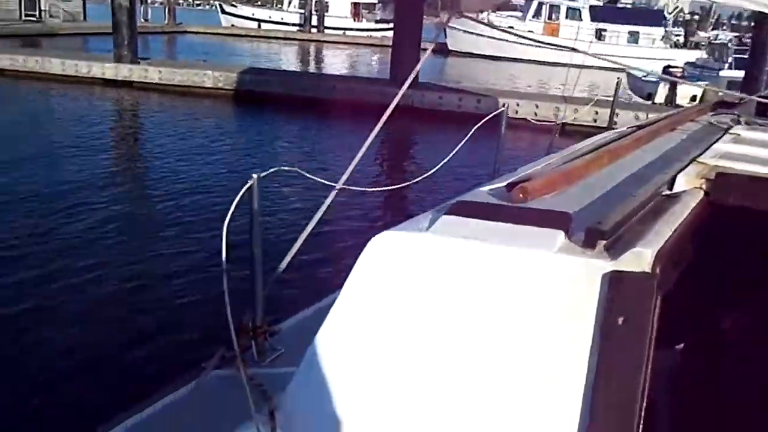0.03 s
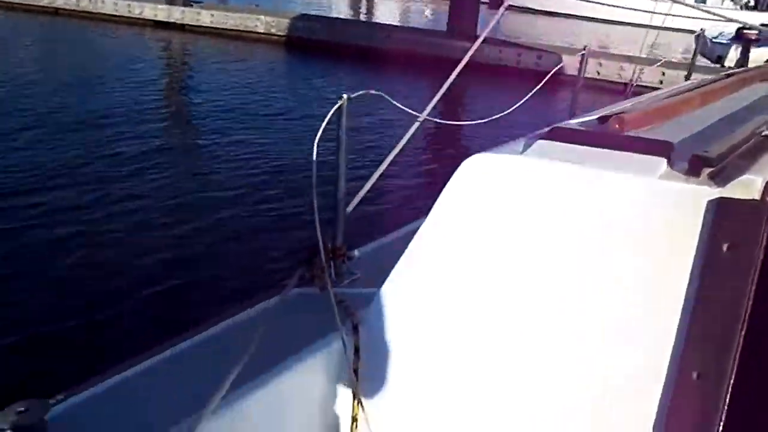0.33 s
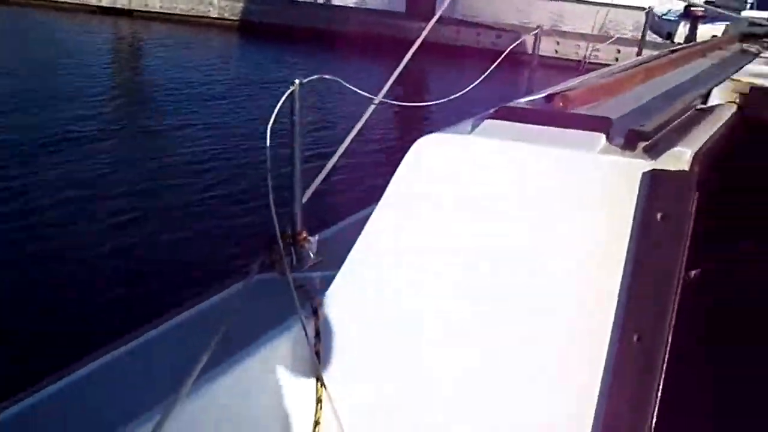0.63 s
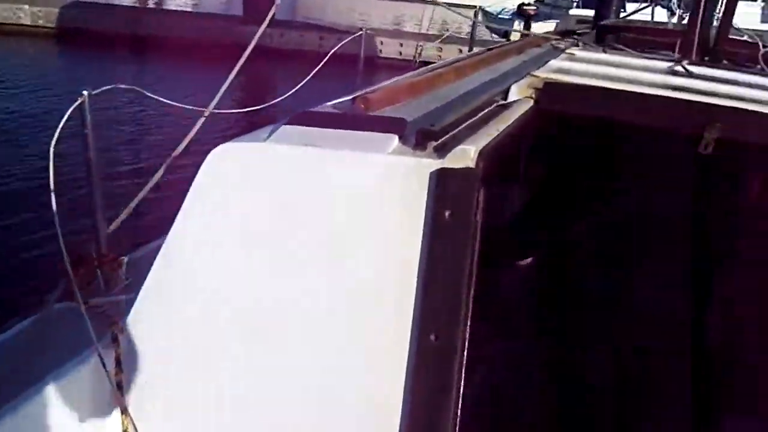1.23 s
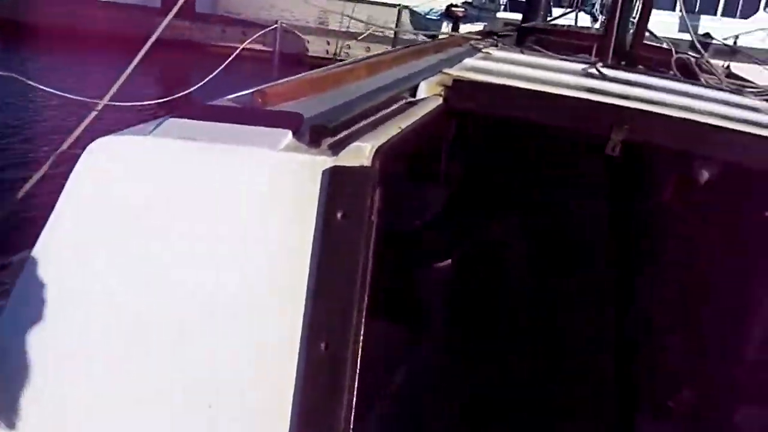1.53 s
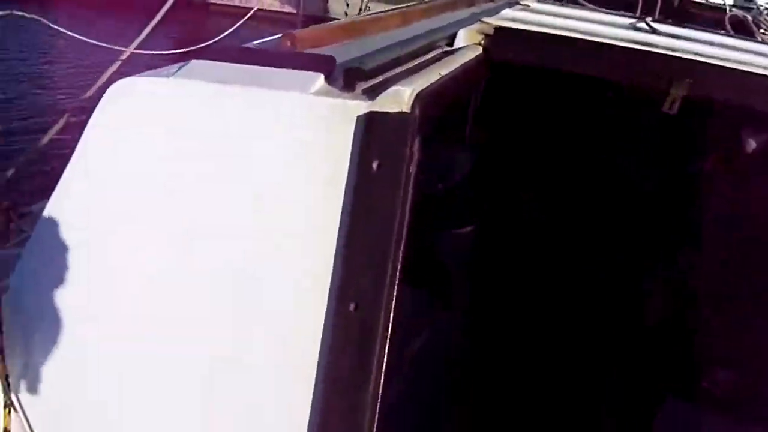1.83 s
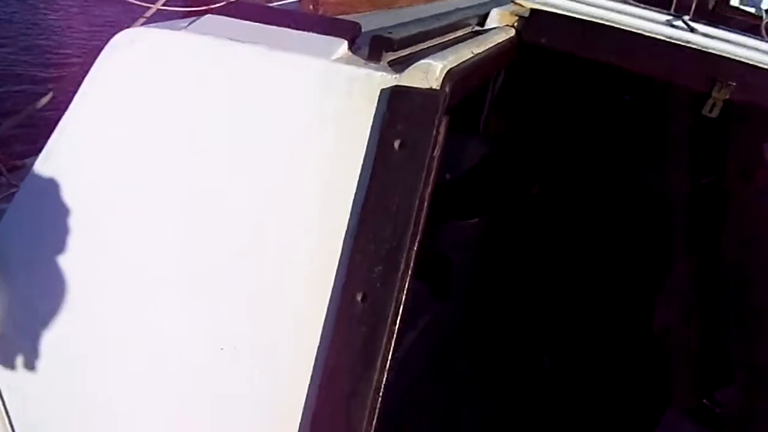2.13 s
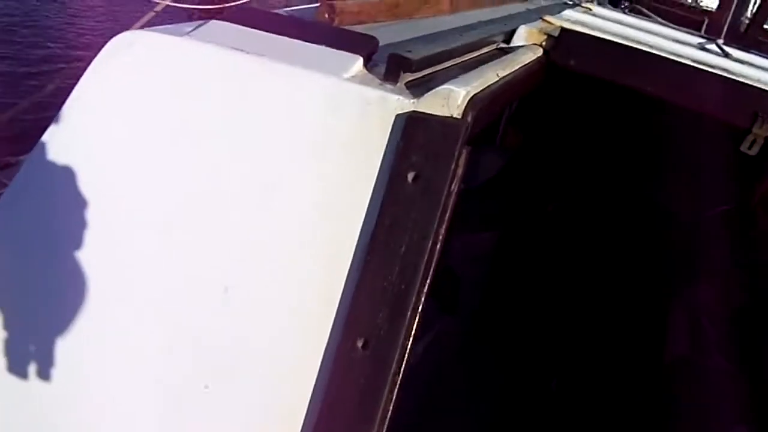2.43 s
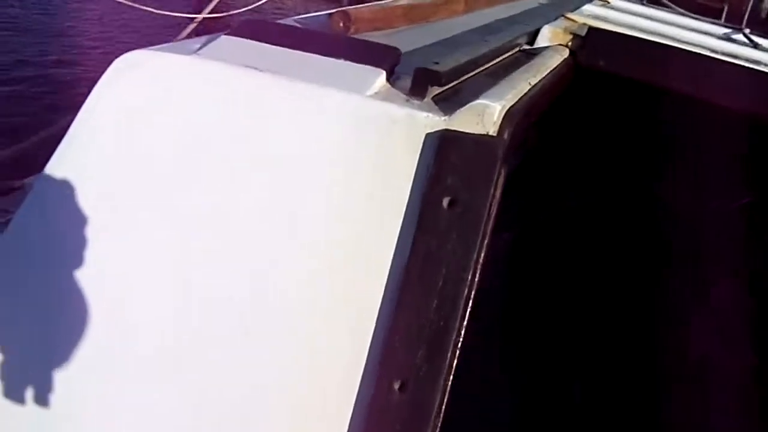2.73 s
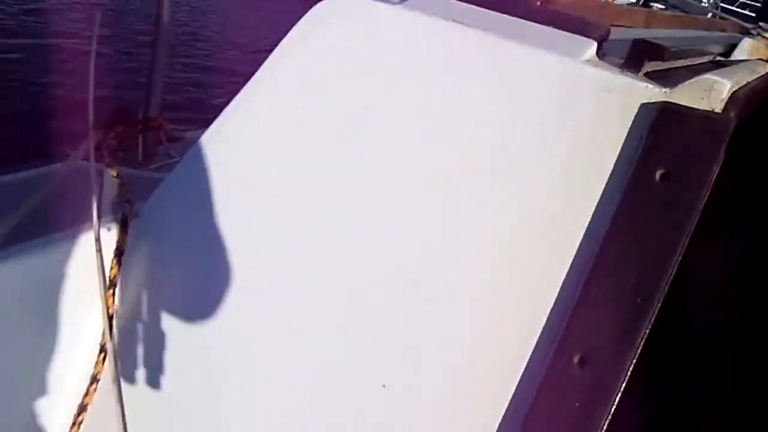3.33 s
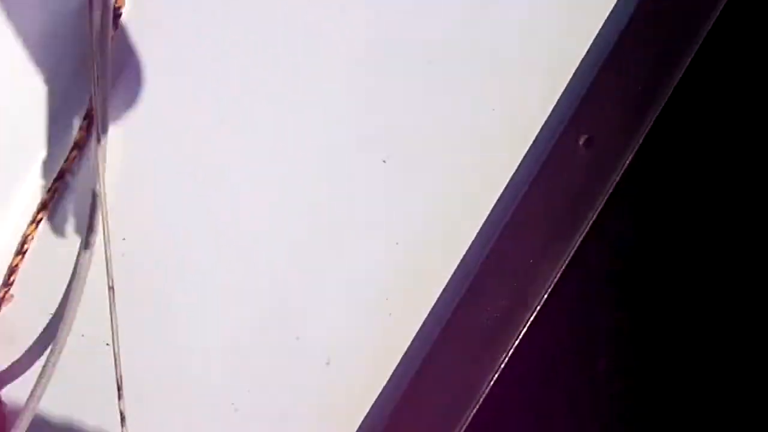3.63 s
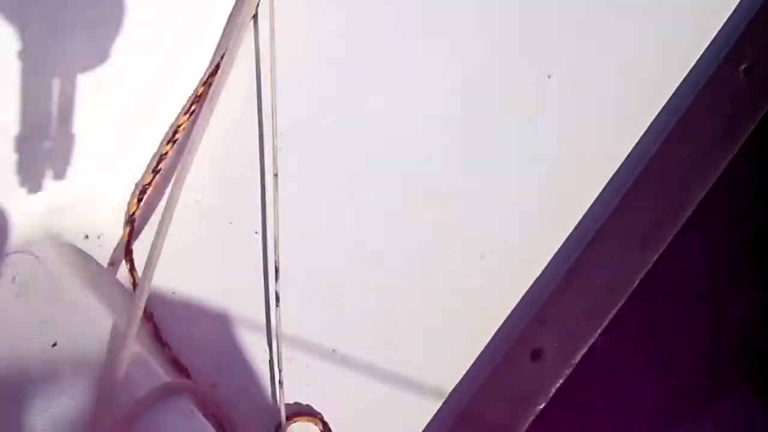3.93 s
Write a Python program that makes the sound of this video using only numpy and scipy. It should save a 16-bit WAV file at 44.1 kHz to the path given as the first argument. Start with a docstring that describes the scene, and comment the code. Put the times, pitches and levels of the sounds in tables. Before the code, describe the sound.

Wind buffets the microphone on a sailboat deck, with handling clicks and a hollow knock.

```python
"""On the deck of a moored sailboat. Gusts buffet the microphone over the wash of harbour water, the hum
of a distant machine and faint far-off squeals. A sleeve brushes past, the hand-held camera clicks and
rubs, a small metal ring taps, and deck and hull take soft bumps. Something knocks on the hollow cabin;
then a hard fitting scrapes, clacks and squeaks as it starts to slide. Struck parts ring in damped modes;
wind, water and rubbing are shaped noise."""
import sys
import numpy as np
from scipy.fft import rfft, irfft, next_fast_len
from scipy.io import wavfile
from scipy.ndimage import map_coordinates

SR = 44100
rng = np.random.default_rng(int(sys.argv[2]) if len(sys.argv) > 2 else 0)


def int16_out(signal):
    """Quantize to a 16-bit WAV file."""
    q = np.round(np.clip(np.atleast_2d(signal).T, -1, 1) * 32767)
    wavfile.write(sys.argv[1], SR, q.astype(np.int16))


N = 176400
TIME_S = np.arange(N) / SR

# Wind spectra. Each row: frequency in Hz, level in dB.
RUMBLE_SPECTRUM = [(15, -4), (30, -7.5), (60, -3), (90, 0.5), (125, -2.5), (160, -6.5), (220, -9.5),
                   (350, -21), (700, -44), (2000, -84)]
DEEP_SPECTRUM = [(15, -3.5), (32, -3), (60, 0.5), (90, -7), (160, -17), (400, -57)]
FLOOR_SPECTRUM = [(50, -49), (120, -4), (200, -2), (330, -2), (500, -9.5), (900, -25), (2500, -42)]
# Gust rumble and its deepest layer. Each row: time in seconds, level in dB.
RUMBLE_DB = [(0, -49), (.3, -43.5), (.42, -30), (.52, -38), (.62, -43.5), (.69, -28), (.92, -28.5),
             (1.13, -29.5), (1.17, -40), (1.62, -46), (1.67, -34), (1.81, -45.5), (1.86, -33.5),
             (1.91, -28.5), (1.98, -42.5), (2.36, -50), (2.5, -39), (2.76, -44.5), (2.96, -35.5),
             (3.04, -39), (3.12, -26.5), (3.19, -50), (3.38, -44.5), (3.47, -38), (4, -46)]
DEEP_DB = [(0, -42), (1.4, -63.5), (1.65, -32.5), (1.76, -43.5), (1.88, -24), (2.0, -46.5), (2.14, -39.5),
           (2.27, -35), (2.36, -43), (2.44, -27), (2.52, -42), (2.8, -42), (2.94, -30), (3.05, -45),
           (4, -69)]
# Single eddies. Each row: centre in seconds, level in dB, half width in seconds.
EDDIES = [(0.363, -10.5, 0.0014), (0.4631, -16, 0.0019), (.475, -25.5, 0.0011), (0.686, -20.5, 0.0013),
          (0.706, -21.5, 0.0019), (0.862, -19, 0.0012), (.948, -22.5, 0.00093), (1.0421, -24, 0.001),
          (1.11, -25.5, 0.005), (1.832, -20.5, 0.0021), (1.889, -19.5, 0.0035)]
# Machine's main and high tones. Each row: time in seconds, level in dB.
HUM_MAIN_DB = [(0, -37.5), (.7, -40.5), (1.2, -38.5), (1.55, -35), (1.85, -36), (2.1, -38.5), (2.5, -35.5),
               (2.65, -38.5), (3, -34), (3.2, -39.5), (3.5, -41), (4, -47.5)]
HUM_HIGH_DB = [(0, -50), (1.5, -50.5), (1.9, -47), (2.6, -48), (2.95, -39), (3.3, -46), (3.65, -44.5),
               (4, -58)]
# Water wash, hiss and sleeve swish. Each row: frequency in Hz, level in dB.
WASH_SPECTRUM = [(100, 1.5), (200, 5), (350, -1), (550, -5), (800, -8), (1200, -14.5), (2000, -23.5),
                 (4000, -36.5), (14000, -40)]
HISS_SPECTRUM = [(500, 4), (1500, -3), (3000, -0.5), (4800, -0.5), (7000, -2.5), (10000, -4), (14000, -4.5)]
SWISH_SPECTRUM = [(2500, -20), (4700, 2.5), (6000, -15), (8000, 3), (9400, -8), (10500, 3), (11600, -13)]
# Hiss and swish envelopes. Each row: time in seconds, level in dB.
HISS_DB = [(0, -60.5), (.65, -64.5), (.95, -56), (1.15, -60.5), (1.42, -56), (1.7, -60.5), (1.88, -58),
           (2.28, -52), (2.45, -55), (2.8, -56), (3.1, -51.5), (3.38, -52.5), (3.52, -58.5), (3.72, -59.5),
           (3.95, -57), (4, -44)]
SWISH_DB = [(.65, -93), (.8, -61), (1.05, -63.5), (1.15, -69.5), (1.42, -60), (1.6, -62), (1.7, -85),
            (2.2, -85)]
# Camera clicks. Each row: start in seconds, four band levels in dB ahead of the casing, t60 in seconds.
CAMERA_CLICKS = [(0.9206, -63, -46, -36, -42, 0.026), (0.949, -66.5, -56, -41.5, -43, 0.054),
                 (2.433, -50, -35, -61, -60, 0.02), (2.4373, -29, -26, -29, -35, 0.034),
                 (2.747, -73, -54, -44.5, -58, 0.021), (2.9626, -48, -42, -56, -62, 0.014),
                 (2.9732, -46, -62, -34.5, -39, 0.017), (3.017, -46, -49, -46, -51, 0.068),
                 (3.0871, -21, -26, -51, -33.5, 0.052), (3.1371, -40.5, -19, -19, -17.5, 0.0214),
                 (3.1391, -23, -23, -32, -26.5, 0.0328), (3.1499, -30, -37, -36, -28, 0.012),
                 (3.161, -31.5, -49, -55, -34.5, 0.026), (3.179, -36, -30, -37, -36, 0.035),
                 (3.6467, -69.5, -72, -44.5, -47, 0.031), (3.710, -53, -53, -51, -45, 0.051),
                 (3.8997, -36.5, -34, -33.5, -40, 0.073), (3.949, -46, -49.5, -38, -43, 0.042)]
# Edges of those four bands in Hz, low to high.
CLICK_BANDS_HZ = [300, 1000, 3000, 6000, 14500]
# Casing response. Each row: frequency in Hz, gain in dB.
CASING_RESPONSE = [(700, -1), (1400, 1), (1900, 1), (2550, 3.5), (3050, -5.5), (4100, 2.5), (4650, -1),
                   (5200, 3), (6200, -4.5), (8000, -3.5), (13000, -5)]
# Deck bumps. Each row: start in seconds, body level in dB, rasp level in dB, body t60 in seconds.
DECK_BUMPS = [(1.176, -41.5, -46.5, 0.24), (1.803, -44, -45, 0.1), (2.089, -41.5, -46.5, 0.094),
              (2.45, -29, -43, 0.085), (2.926, -47.5, -49, 0.88), (3.068, -28, -35.5, 0.061),
              (3.1, -26.5, -34, 0.27), (3.222, -59, -37, 0.048), (3.369, -33.5, -45.5, 0.097),
              (3.419, -32, -38.5, 0.11), (3.665, -36, -43, 0.11), (3.745, -50.5, -42.5, 0.078),
              (3.774, -37.5, -41, 0.26)]
# Bump spectra. Each row: frequency in Hz, level in dB.
BODY_SPECTRUM = [(120, -14), (250, -2.5), (355, 4.5), (430, -8), (520, 0), (750, -7.5), (1100, -26),
                 (3000, -39)]
RASP_SPECTRUM = [(400, -13), (800, -2.5), (1400, -1.5), (2500, -8), (4000, -12.5), (7000, -19),
                 (14000, -24)]
# Modes of the struck parts. Each row: frequency in Hz, level in dB, t60 in seconds.
SHACKLE_MODES = [(2090, -13.5, 0.059), (2430, -5.5, 0.032), (2670, -2, 0.016), (3800, -6.5, 0.016),
                 (4600, 1.5, 0.016), (5100, 0, 0.0074), (5360, -5, 0.035), (7740, -10, 0.018)]
HULL_MODES = [(350.5, -10.5, 0.16), (379.5, 2, 0.0604), (480, -5, 0.04), (596, -12, 0.047),
              (840, -13, 0.038)]
CABIN_MODES = [(194, -9, 0.063), (357, -18, 0.06), (505, -11, 0.086), (615, -6, 0.026), (725, -9.5, 0.031),
               (937, -3, 0.026), (1058, 0, 0.022), (1147, 1.5, 0.024)]
FITTING_MODES = [(1044, -12.5, 0.12), (1504, -4.5, 0.031), (2210, -10, 0.024), (3868, 3, 0.024),
                 (4020, 3, 0.02), (5265, -1.5, 0.025), (6340, -10.5, 0.022), (7500, -14.5, 0.028),
                 (11100, -22, 0.016)]
# Strikes on those parts. Each row: start in seconds, level in dB.
SHACKLE_HITS = [(.9217, -33), (.9502, -40.5), (.9592, -36.5)]
HULL_HITS = [(1.178, -25), (2.4495, -27), (3.425, -34)]
CABIN_HITS = [(3.0882, -8), (3.0911, -11)]
FITTING_HITS = [(3.901, -18.5), (3.9045, -26.5)]
# Gliding tones. Each row: start and length in seconds, start and end pitch in Hz, level in dB.
FAR_SQUEALS = [(1.381, 0.078, 1070, 1090, -53.5), (1.45, 0.0495, 2110, 2173, -59),
               (1.522, 0.14, 1390, 1290, -60.5)]
FRICTION_SQUEAKS = [(2.934, 0.016, 2400, 2560, -47), (3.014, 0.014, 3300, 3380, -48),
                    (3.067, 0.0071, 2200, 2350, -38), (3.845, 0.07, 1010, 1030, -46.5),
                    (3.935, 0.085, 1090, 1160, -41.5), (3.945, 0.065, 2860, 2780, -47),
                    (3.97, 0.045, 2600, 2530, -46), (3.963, 0.05, 4740, 4580, -47)]
# First contact of hard clicks. Each row: centre in seconds, level in dB, half width in seconds.
CONTACT_SNAPS = [(2.4389, -19, 0.00012), (2.9738, -27.5, 0.000045), (3.1379, -6.5, 0.000026)]
# Scrape envelope. Each row: time in seconds, level in dB.
SCRAPE_DB = [(3.72, -70), (3.8, -53), (3.88, -44.5), (3.93, -40), (4, -36.5)]
# Scrape resonances. Each row: frequency in Hz, bandwidth in Hz, relative level in dB.
SCRAPE_RESONANCES = [(345, 85, 3.5), (450, 81, 0), (716, 72, -3.5), (1077, 110, -5), (1240, 92, -1.5),
                     (1400, 170, -7.5), (2470, 173, -7), (2890, 160, -13), (3723, 380, -8), (4810, 360, -9),
                     (6850, 2400, -21)]


def amp(db):
    """Decibels to gain."""
    return 10 ** (np.asarray(db) / 20)


def unit(x):
    """Scale to rms 1."""
    return x / np.sqrt(np.mean(x ** 2) + 1e-20)


def curve(rows):
    """(s, value) points as one value per sample."""
    return np.interp(TIME_S, *np.transpose(rows))


def wobble(rate_hz):
    """Smooth random curve, rate_hz knots a second."""
    knots = rng.standard_normal(int(N * rate_hz / SR) + 4)
    return map_coordinates(knots, [TIME_S * rate_hz])


def filtered(x, response):
    """Apply a frequency response."""
    size = next_fast_len(N + SR // 2)
    return irfft(rfft(x, size) * response(np.fft.rfftfreq(size, 1 / SR)), size)[:N]


def noise(spectrum):
    """Noise of rms 1 with a (Hz, dB) spectrum."""
    hz, db = np.transpose(spectrum)
    white = rng.standard_normal(N)
    return unit(filtered(white, lambda f: amp(np.interp(np.log(f + 1), np.log(hz), db))))


def burst(start_s, t60_s, attack_s):
    """Fast rise, exponential decay."""
    age_s = np.maximum(TIME_S - start_s, 0)
    return (1 - np.exp(-age_s / attack_s)) * amp(-60 * np.minimum(age_s / t60_s, 10))


def ring(hits, modes, attack_s, scatter_db):
    """Damped modes, rung anew by every hit."""
    out, t = np.zeros(N + SR), np.arange(SR // 4) / SR
    for start_s, hit_db in hits:
        tone = sum(amp(db + scatter_db * rng.normal() - 60 * t / t60_s) * np.sin(2 * np.pi * hz * t)
                   for hz, db, t60_s in modes)
        out[round(start_s * SR):][:len(t)] += amp(hit_db) * tone * (1 - np.exp(-t / attack_s))
    return out[:N]


def glides(rows, waver_hz, rate_hz):
    """Short tones that swell, glide and waver."""
    out = np.zeros(N)
    for start_s, length_s, start_hz, end_hz, db in rows:
        progress = np.clip((TIME_S - start_s) / length_s, 0, 1)
        hz = start_hz + (end_hz - start_hz) * progress + waver_hz * wobble(rate_hz)
        out += amp(db) * np.sin(np.pi * progress) * np.sin(2 * np.pi * np.cumsum(hz) / SR)
    return out


def wind():
    """Gusts rumble over a deeper layer; single eddies thump the microphone."""
    rumble = amp(curve(RUMBLE_DB)) * unit(noise(RUMBLE_SPECTRUM) * amp(2.54 * wobble(25.093)))
    floor = amp(-80) * unit(noise(FLOOR_SPECTRUM) * amp(5.2 * wobble(69.13)))  # inaudible
    thumps = np.zeros(N)
    for centre_s, db, width_s in EDDIES:
        lead = (centre_s - TIME_S) / width_s
        thumps += amp(db) * 2 * lead / (1 + lead ** 2) ** 1.68
    deep = amp(curve(DEEP_DB)) * noise(DEEP_SPECTRUM)
    return deep + rumble + floor + thumps


def machine(main_hz=238.8, high_hz=269.2, low_hz=209.5):
    """Four slightly unsteady tones from across the harbour."""
    tones = [(main_hz, curve(HUM_MAIN_DB)), (high_hz, curve(HUM_HIGH_DB)),
             (low_hz, -54), (main_hz / 2, -49.5)]
    out = np.zeros(N)
    for hz, rms_db in tones:
        peak = np.sqrt(2) * amp(rms_db + .6 * wobble(6))
        out += peak * np.sin(2 * np.pi * np.cumsum(hz + .25 * wobble(5)) / SR)
    return out


def water(wash_db=-48):
    """Steady wash of harbour water under a drifting hiss."""
    wash = amp(wash_db + 0.82 * wobble(8.45)) * noise(WASH_SPECTRUM)
    hiss = amp(curve(HISS_DB) + 1.5 * wobble(40)) * noise(HISS_SPECTRUM)
    return wash + hiss


def sleeve():
    """Cloth brushes past, finely grained."""
    swish = noise(SWISH_SPECTRUM)
    grain_db = 3.5 * wobble(39.87) + 5.5 * wobble(300)
    return amp(curve(SWISH_DB)) * unit(swish * amp(grain_db))


def camera_clicks(crack_t60_s=0.0055, tail_t60_s=0.11, tail_db=-16.5):
    """Dry handling clicks: noise bursts with a crack and a short tail, coloured by the casing."""
    envelopes = [burst(start_s, t60_s, attack_s=0.000655)
                 + burst(start_s, crack_t60_s, attack_s=0.00061)
                 + amp(tail_db) * burst(start_s, tail_t60_s, attack_s=0.0026)
                 for start_s, *_, t60_s in CAMERA_CLICKS]
    out = np.zeros(N)
    for column, (low_hz, high_hz) in enumerate(zip(CLICK_BANDS_HZ, CLICK_BANDS_HZ[1:]), start=1):
        band = noise([(low_hz / 2, -40), (low_hz, 0), (high_hz, -3), (high_hz * 4.5, -40)])
        out += band * sum(amp(row[column]) * envelope for row, envelope in zip(CAMERA_CLICKS, envelopes))
    return filtered(out, lambda hz: amp(np.interp(hz, *np.transpose(CASING_RESPONSE))))


def shackle_taps():
    """A small metal ring taps three times."""
    return ring(SHACKLE_HITS, SHACKLE_MODES, attack_s=0.0001, scatter_db=3.0)


def deck_bumps():
    """Soft bumps on the deck: a dull body, and a rasp that rises and dies sooner."""
    body = noise(BODY_SPECTRUM)
    rasp = unit(noise(RASP_SPECTRUM) * amp(wobble(400)))
    out = np.zeros(N)
    for start_s, body_db, rasp_db, t60_s in DECK_BUMPS:
        out += amp(body_db) * burst(start_s, t60_s, attack_s=0.0023) * body
        out += amp(rasp_db) * burst(start_s, 0.68 * t60_s, attack_s=0.00071) * rasp
    return out


def hull_thuds():
    """The hull thuds in its low modes."""
    return ring(HULL_HITS, HULL_MODES, attack_s=0.0014, scatter_db=0.7)


def squeals():
    """Thin wavering tones from far across the water."""
    return glides(FAR_SQUEALS, waver_hz=16, rate_hz=140)


def snaps():
    """One sharp push and pull where hard parts first meet."""
    out = np.zeros(N)
    for centre_s, db, width_s in CONTACT_SNAPS:
        lead = (centre_s - TIME_S) / width_s
        out += amp(db) * 2 * lead * np.exp(-lead ** 2)
    return out


def friction():
    """Brief creaks before the knock, then squeaks of the sliding fitting."""
    return glides(FRICTION_SQUEAKS, waver_hz=30.2, rate_hz=340)


def cabin_knock():
    """Two close contacts ring the hollow cabin as one knock."""
    return ring(CABIN_HITS, CABIN_MODES, attack_s=0.0011, scatter_db=2.8)


def fitting_scrape():
    """Gritty sliding drives the fitting's resonances; each flares on its own."""
    grit = amp(2.4 * wobble(500))
    scrape = np.zeros(N)
    for hz, width_hz, db in SCRAPE_RESONANCES:
        drive = rng.standard_normal(N) * grit
        resonance = filtered(drive, lambda f: 1j * f * width_hz / (hz * hz - f * f + 1j * f * width_hz))
        scrape += resonance * amp(db + 4.9 * wobble(35))
    return amp(curve(SCRAPE_DB)) * unit(scrape)


def fitting_clack():
    """Two close contacts ring the hard fitting as one clack."""
    return ring(FITTING_HITS, FITTING_MODES, attack_s=0.00078, scatter_db=2.5)


def scene():
    """All sources at one microphone."""
    mix = wind() + machine() + water() + sleeve() + camera_clicks() + shackle_taps() + deck_bumps()
    mix += hull_thuds() + squeals() + snaps() + friction() + cabin_knock()
    mix += fitting_scrape() + fitting_clack()
    return mix[None]


def record(dry):
    """The camera passes nothing above its band limit."""
    return filtered(dry[0], lambda hz: hz < 14150)[None]


dry = scene()
out = record(dry)
int16_out(out)
```